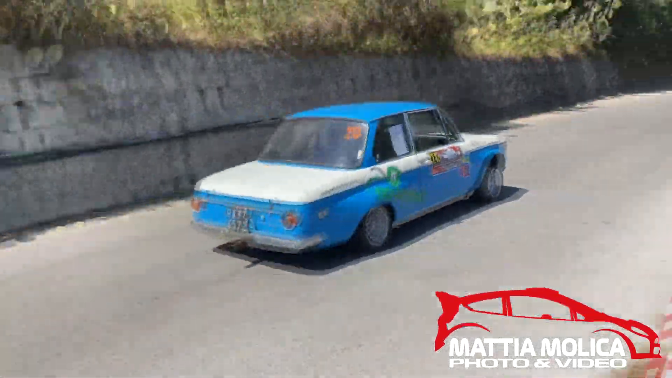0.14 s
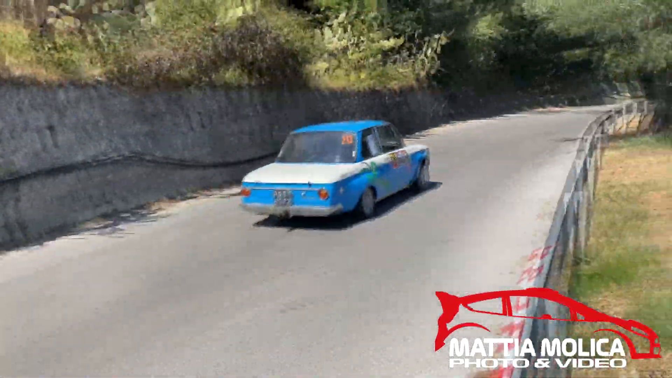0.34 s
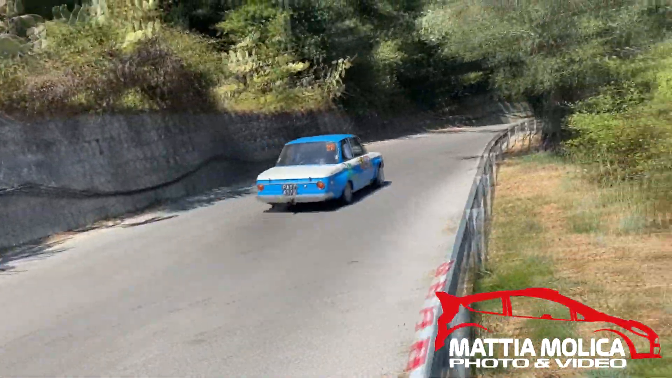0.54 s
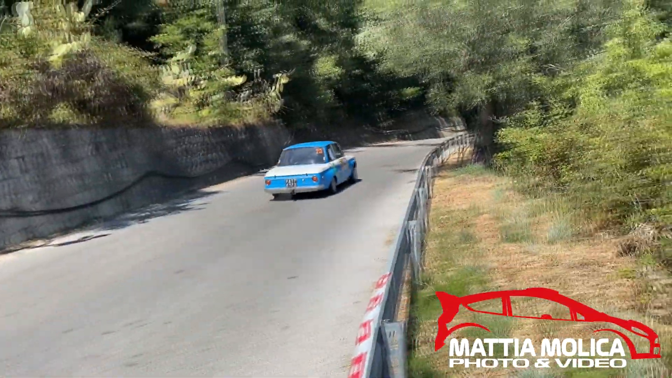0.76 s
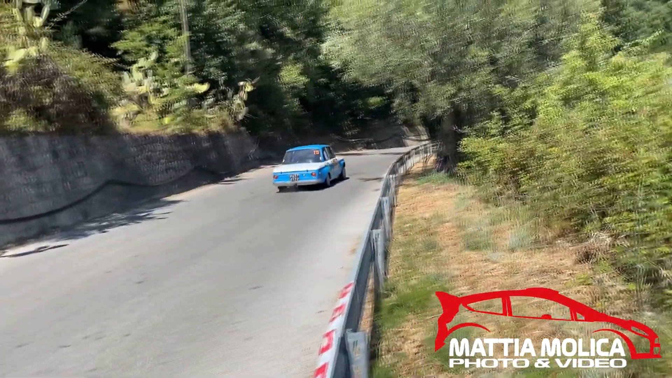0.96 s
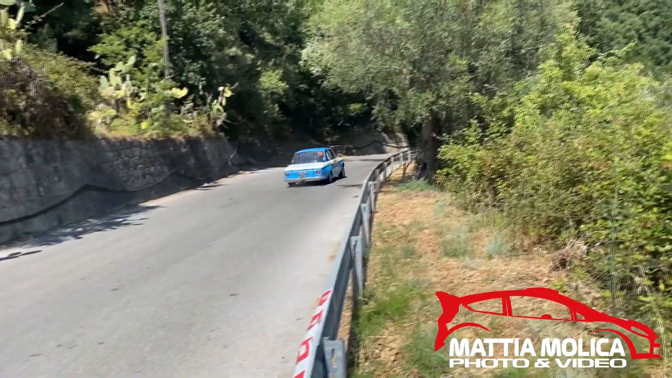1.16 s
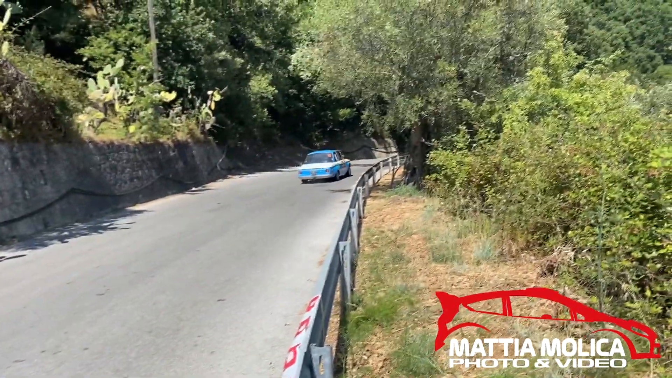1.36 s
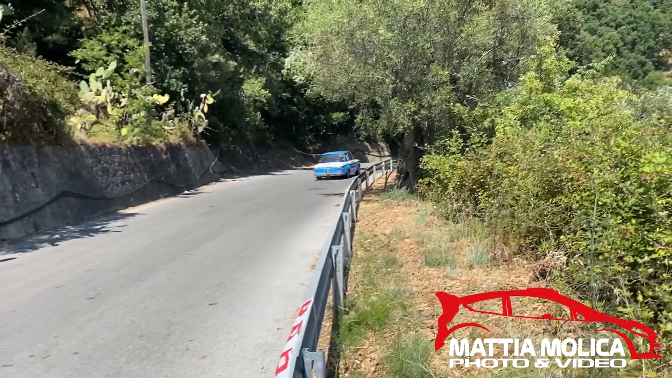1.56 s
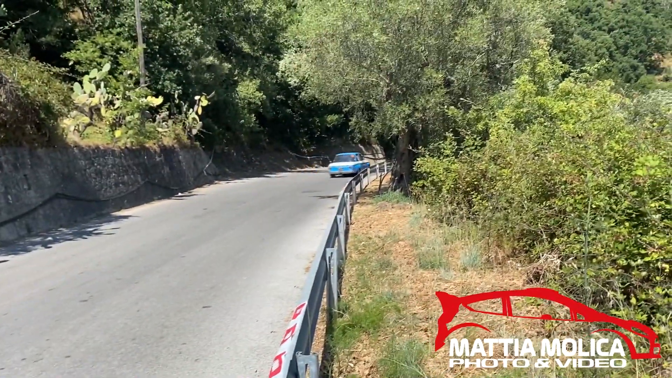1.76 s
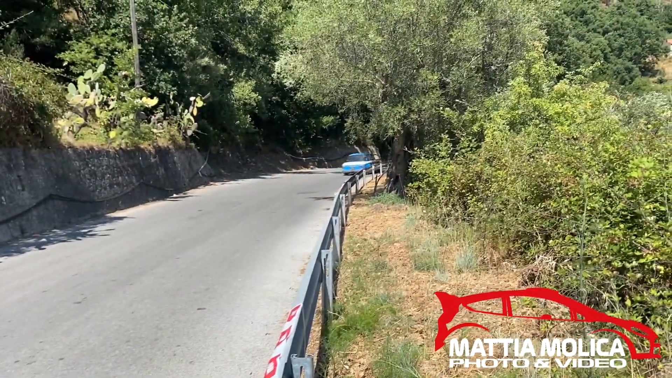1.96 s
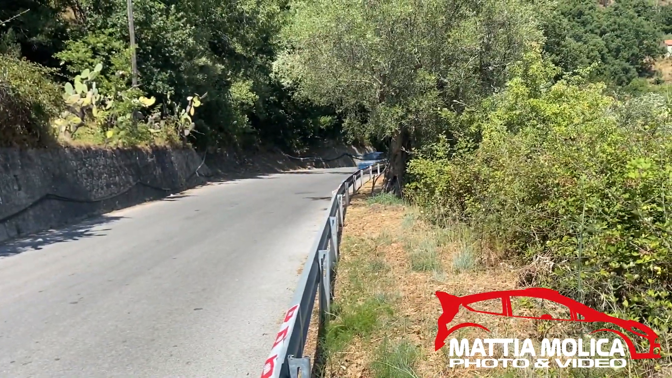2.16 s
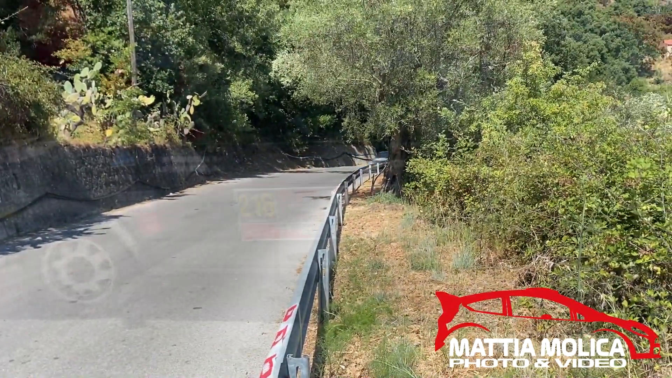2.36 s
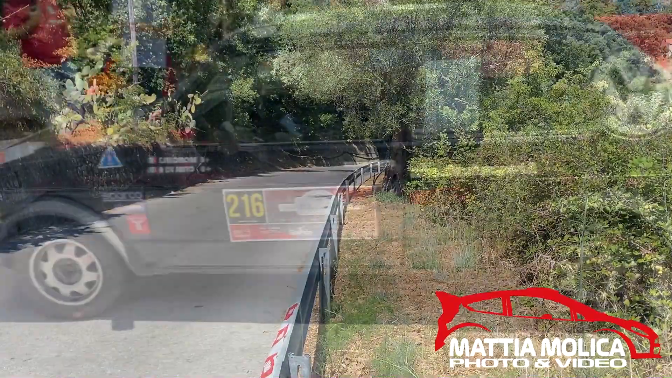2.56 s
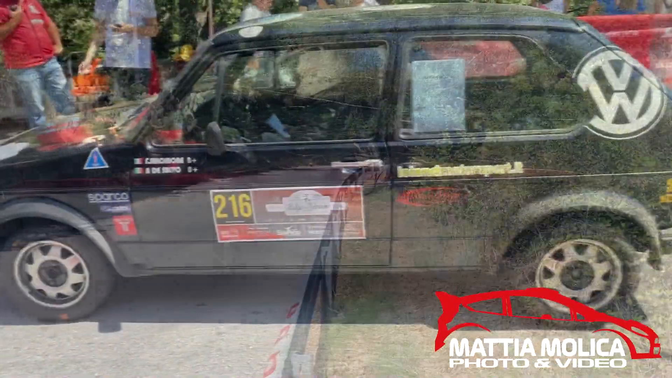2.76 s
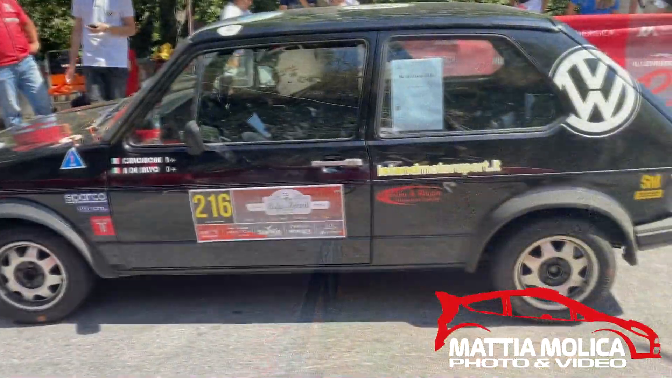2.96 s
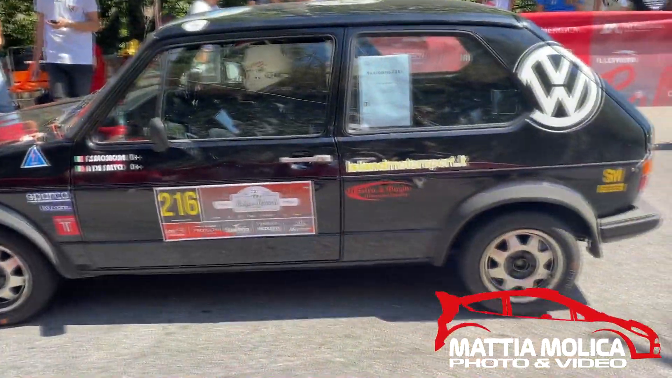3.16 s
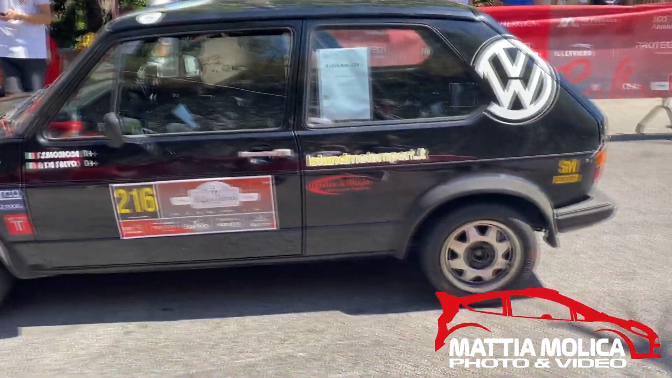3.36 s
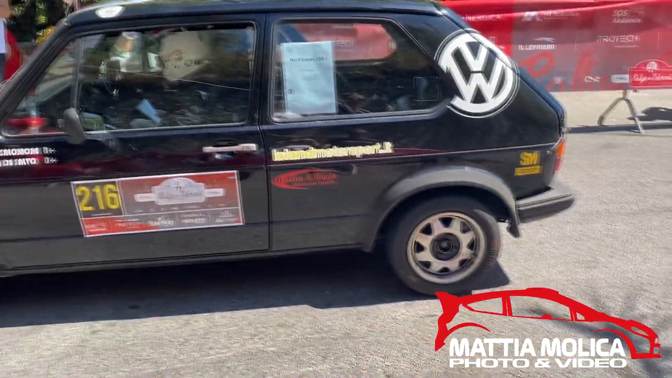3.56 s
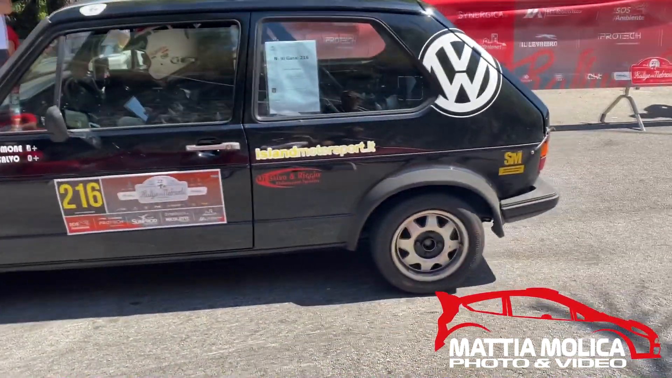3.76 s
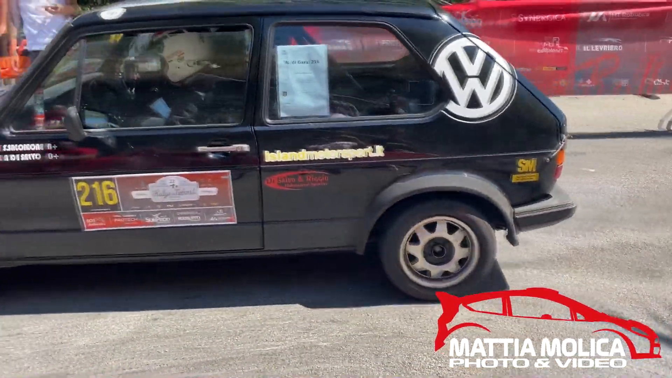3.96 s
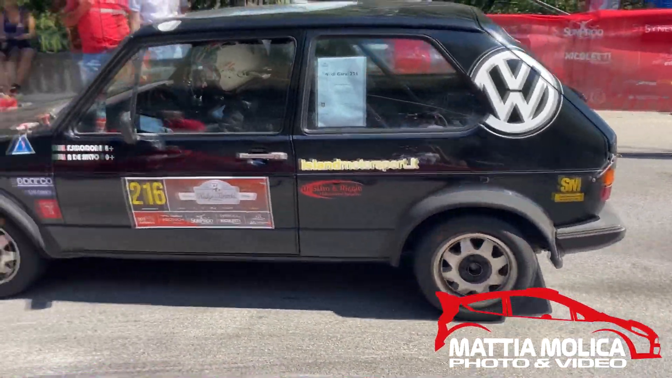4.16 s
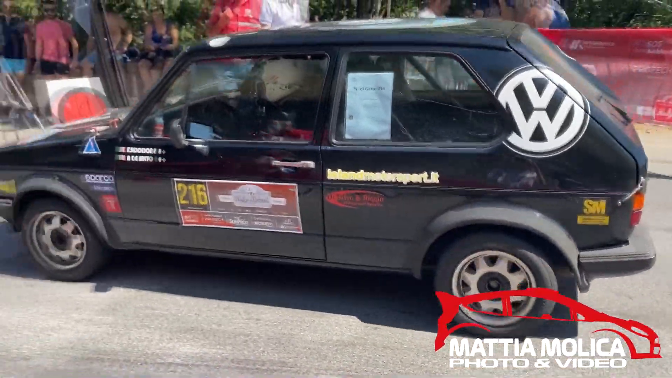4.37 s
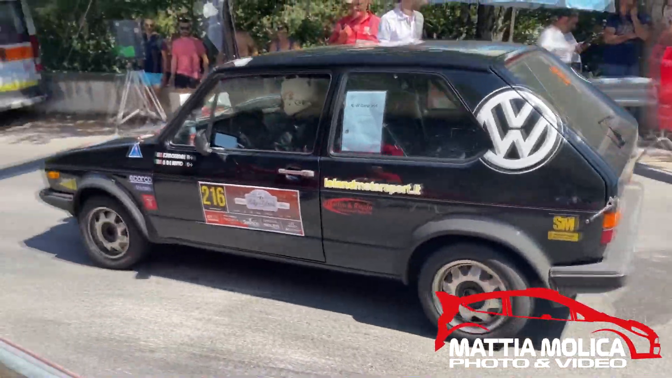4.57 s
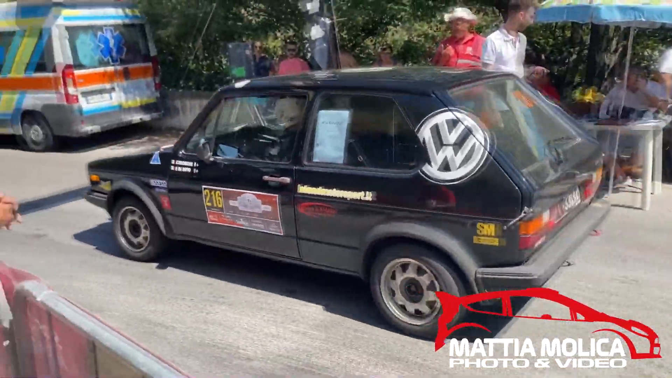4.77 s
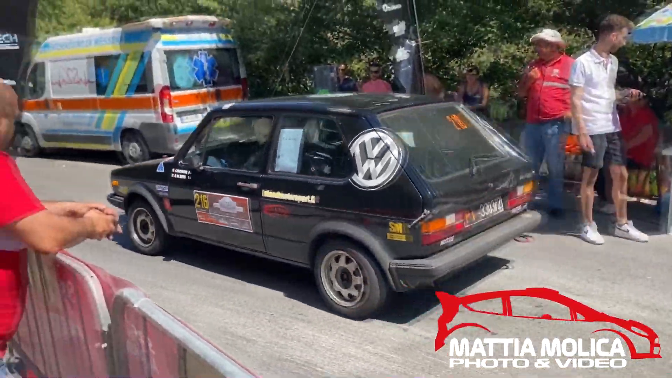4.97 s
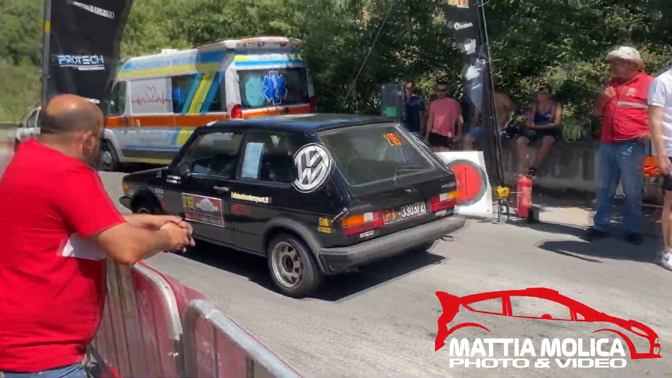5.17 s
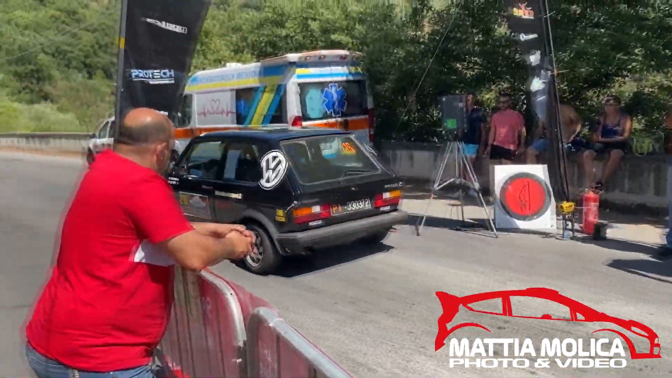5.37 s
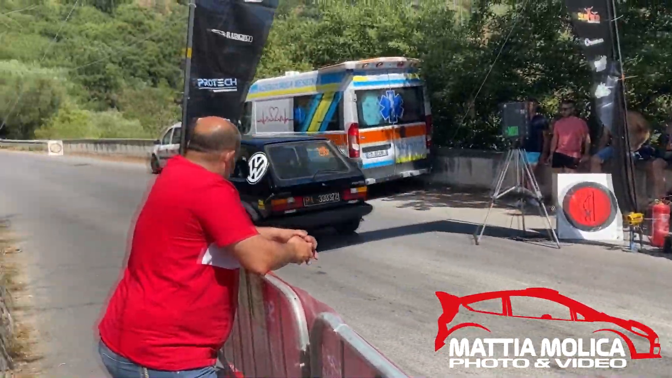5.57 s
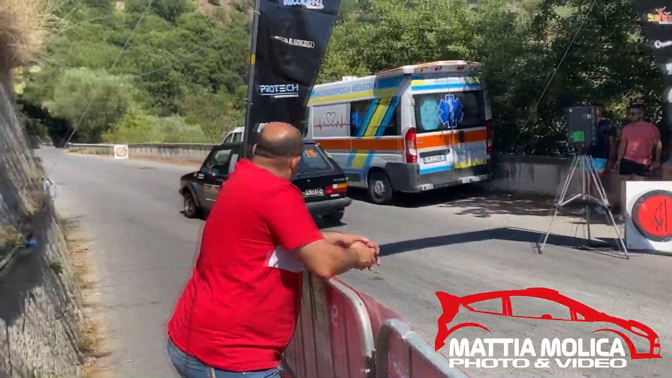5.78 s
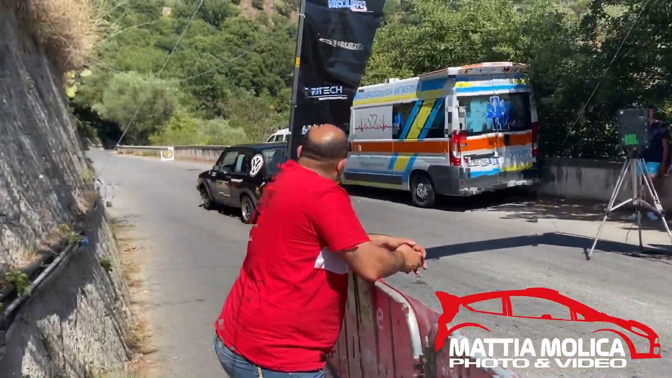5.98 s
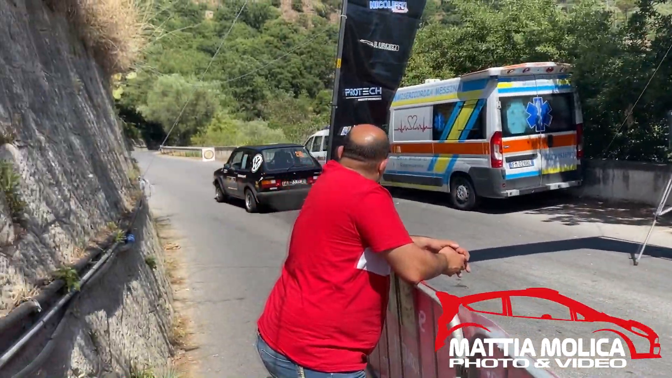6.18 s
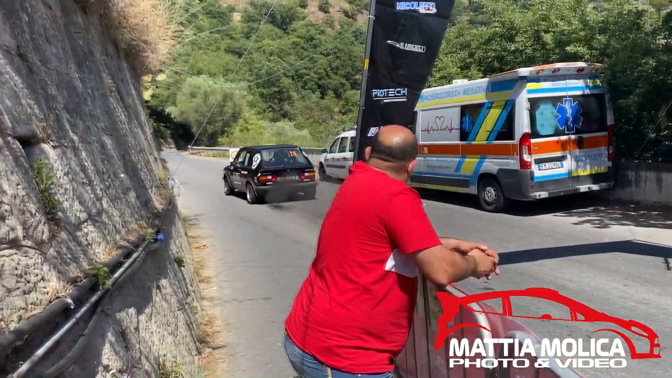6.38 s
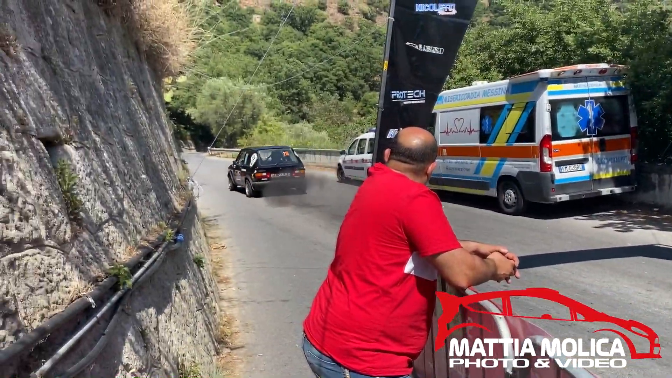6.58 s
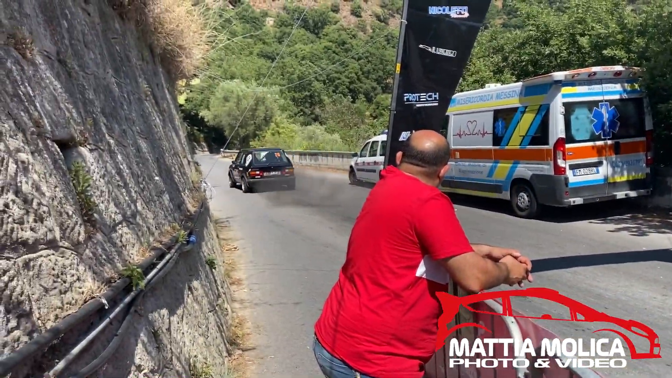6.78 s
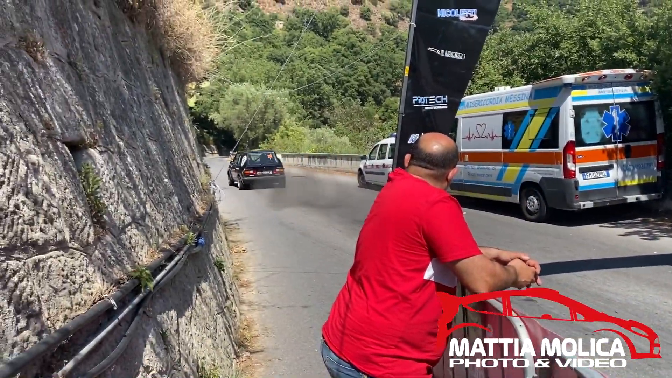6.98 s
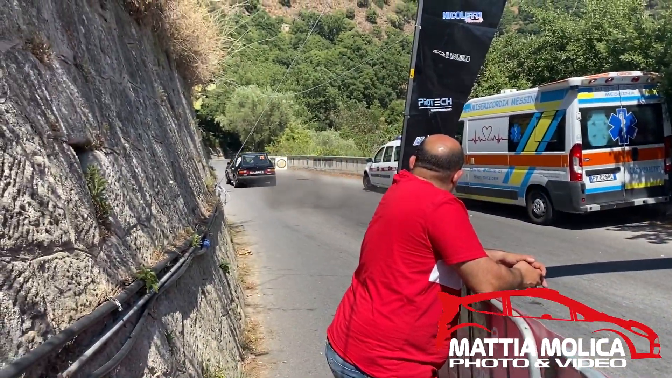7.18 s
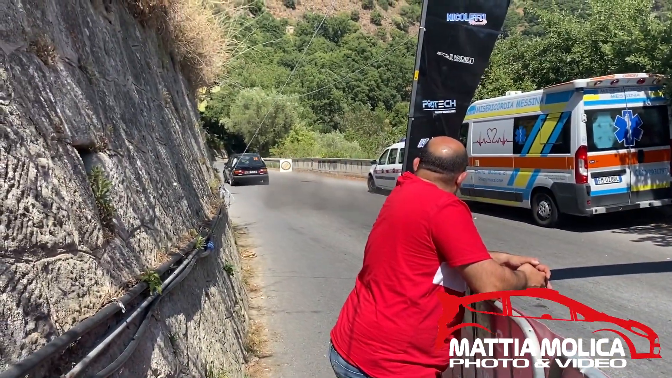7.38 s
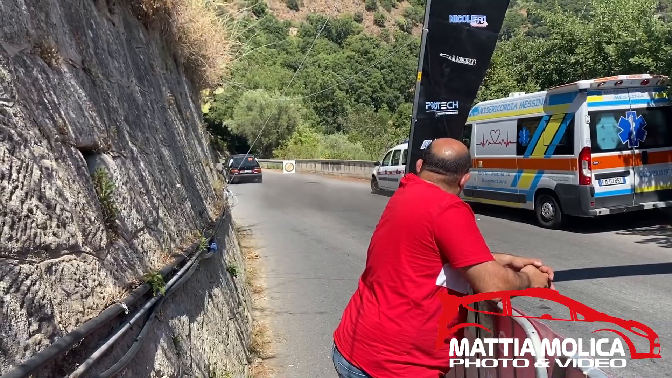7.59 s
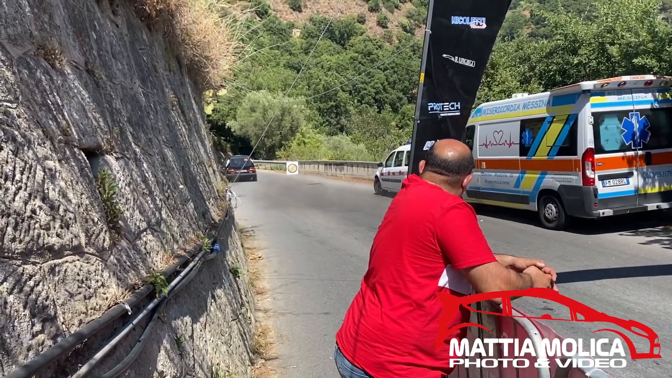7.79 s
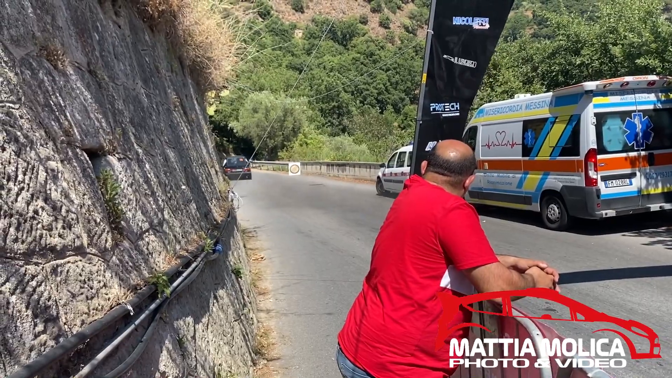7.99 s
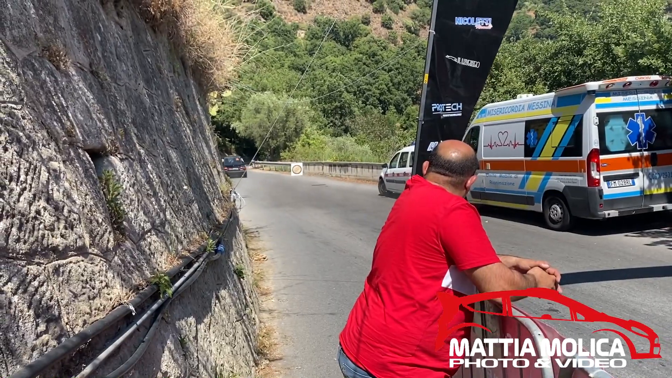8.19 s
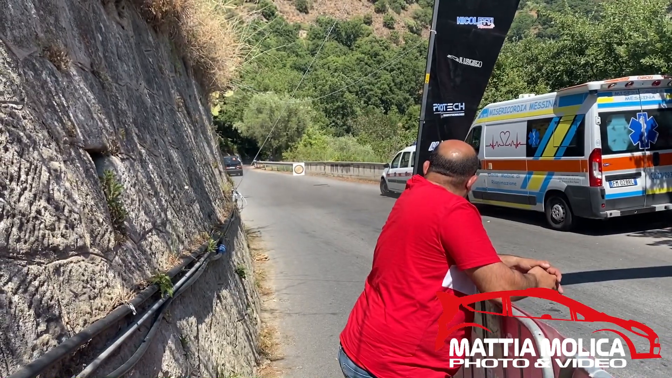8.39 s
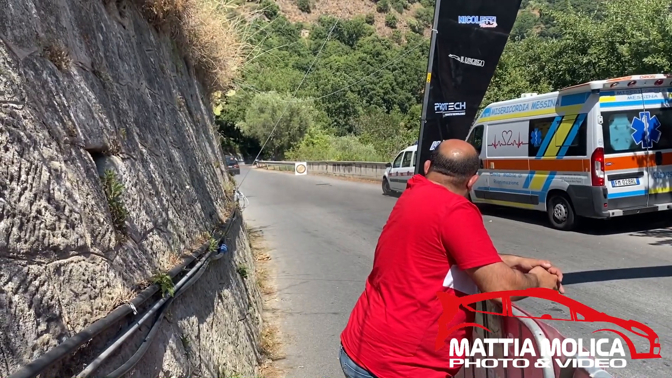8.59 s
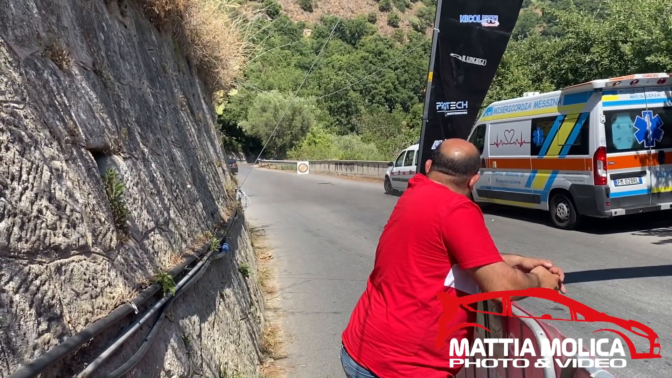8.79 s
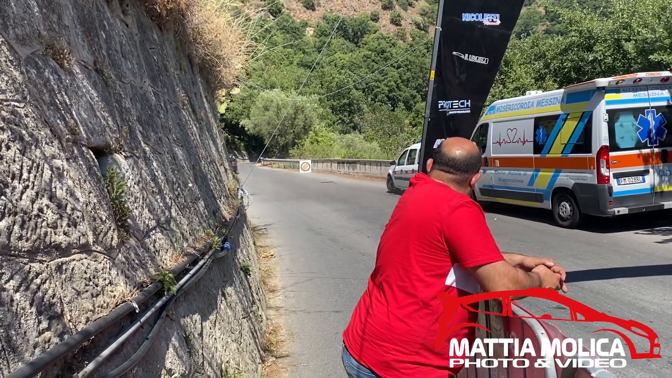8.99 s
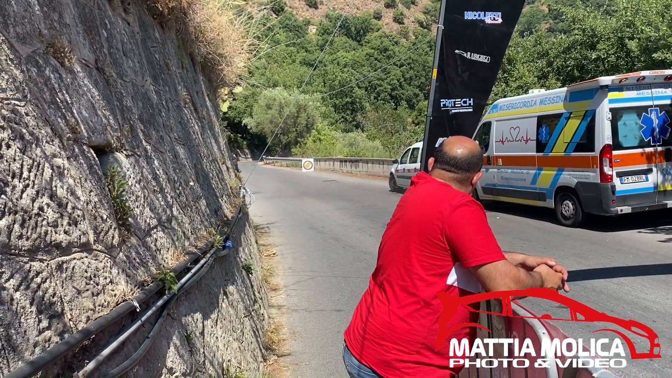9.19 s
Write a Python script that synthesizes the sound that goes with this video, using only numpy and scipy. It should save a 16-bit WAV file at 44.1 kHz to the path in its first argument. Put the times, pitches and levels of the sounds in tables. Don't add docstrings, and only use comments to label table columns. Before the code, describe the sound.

Two old rally cars in turn, heard from the roadside with short echoes off stone. The first leaves with a rising rasp, quickly dropping in level and crackling softly. The second starts close and full, revs held, throttle stabs and low pops, then the note sags, climbs strongly, drops at a gear change and climbs again more quietly. Wind rumbles low on the microphone, strongest at the opening and the launch.

```python
import sys
import numpy as np
from scipy import signal
from scipy.fft import rfft, irfft
from scipy.io import wavfile
from scipy.ndimage import uniform_filter1d

SR = 44100
rng = np.random.default_rng(int(sys.argv[2]) if len(sys.argv) > 2 else 0)


def amplitude_ratio(level_db):
    exponent = np.asarray(level_db, float) / 20
    return 10 ** exponent


def unload_audio(sound):
    columns = np.transpose(np.atleast_2d(sound))
    steps = np.round(np.clip(columns, -1, 1) * 32767)
    wavfile.write(sys.argv[1], SR, steps.astype(np.int16))


N = 407476

# start_s, end_s
FADE_S = [2.2, 2.74]
# start_s, hold_s, fizz_db
BAY = [
    (2.2, 1.304, 7.5),
]


def evened(x):
    return x / np.sqrt(np.mean(x ** 2) + 1e-20)


def steadied(x):
    return x / np.sqrt(abs(uniform_filter1d(x ** 2, size=6000)) + 1e-12)


def wander(size):
    once = uniform_filter1d(rng.standard_normal(N), size=size)
    return evened(uniform_filter1d(once, size=size))


def read(points, hz):
    f, value = np.transpose(points)
    return np.interp(np.log(hz + 1), np.log(f + 1), value)


def columns(rows):
    s, *values = np.transpose(rows)
    return [np.interp(np.arange(N) / SR, s, v) for v in values]


def swell(rows, rise_s, fall_s):
    t = np.arange(N) / SR
    total = 0
    for start_s, hold_s, *values in rows:
        rise = np.clip((t - start_s) / rise_s, 0, 1)
        fall = np.exp(-np.maximum(t - start_s - rise_s - hold_s, 0) / fall_s)
        total = total + np.outer(values, rise * fall)
    return total


def colour(x, points, lo_hz, hi_hz, steep=3):
    hz = abs(np.fft.fftfreq(8192, 1 / SR)) + 1
    edges = (1 + (lo_hz / hz) ** steep) * (1 + (hz / hi_hz) ** steep)
    log_gain = np.log(amplitude_ratio(read(points, hz)) / edges + 1e-6)
    taps = np.fft.ifft(np.exp(np.conj(signal.hilbert(log_gain)))).real[:2048]
    return signal.oaconvolve(x, taps)[:N]


def resonate(x, hz, width):
    turn = np.exp(2j * np.pi * np.cumsum(hz) / SR)
    r = np.exp(-np.pi * width / SR)
    return 2 * (turn * signal.lfilter([1 - r], [1, -r], x / turn)).real


def ports(x, lead, tilt):
    hz, z = np.fft.rfftfreq(N, 1 / SR), rfft(x)
    half = np.exp(.5j * read(lead, hz)) * amplitude_ratio(read(tilt, hz) / 2)
    return np.array([irfft(z * half, N), irfft(z / half, N)])


def exhaust_note(hz, turns, whole_db, uneven_db, odd, far):
    # pitch_hz, level_db_per_hz
    boom = [(60, -41.5), (110, -8), (200, -4.5), (330, -7.5), (450, -9)]
    low = np.zeros(N)
    for k, db in enumerate(whole_db, 1):
        low += amplitude_ratio(db + .5 * k * wander(size=2500)) * np.cos(k * (2 * np.pi * turns + 0.16) - .6)
    for k, db in odd:
        phase = 2 * np.pi * (k * turns + rng.random())
        low += amplitude_ratio(uneven_db + db + 1.6 * wander(size=900)) * np.cos(phase)
    shaking = evened(colour(rng.standard_normal(N), boom, lo_hz=87, hi_hz=475, steep=5.9))
    return low + amplitude_ratio(uneven_db - 5.5 - 2.3 * far) * shaking


def firing_bursts(hz, turns, late, imbalance, rough, cylinders_db, scatter_db, burst_s, bed):
    firing = np.round(turns + late).astype(int)
    since = turns + late - firing
    apart = np.where(since < 0, -since * 0.6, since)
    scatter = scatter_db * rng.standard_normal(N)[firing]
    size = amplitude_ratio(imbalance * np.take(cylinders_db, firing % 4) + scatter)
    clicks = steadied(size * (np.diff(np.sign(since), prepend=1) > 0))
    puff_shape = size * np.exp(-apart / hz / burst_s) + bed * rough
    puffs = steadied(puff_shape * rng.standard_normal(N))
    return size, clicks, puffs


def tailpipe_rasp(drive, pipes, far, ringing, lift, low_peak_hz, middle_peak_hz, ring):
    rasp = np.zeros(N)
    for share, pipe in zip((1 - far, far), pipes):
        rasp += share * evened(colour(drive, pipe, lo_hz=460, hi_hz=2700, steep=6.53))
    rasp = rasp + ringing * resonate(rasp, middle_peak_hz, width=330)
    rasp = rasp - lift * resonate(rasp, np.full(N, 540.), width=262)
    low_peak = resonate(resonate(rasp, low_peak_hz, width=540), low_peak_hz, width=520)
    return steadied(rasp + ring * low_peak)


def gas_hiss(clicks, puffs, rough, pipe, high_peak_hz):
    t = np.arange(N) / SR
    hiss = colour((1 - rough) * clicks + 3.02 * rough * puffs, pipe, lo_hz=2890, hi_hz=8750)
    hiss = hiss + .2 * np.interp(t - 2 / high_peak_hz, t, hiss)
    return steadied(hiss + 1.4 * resonate(hiss, high_peak_hz, width=800))


def engine(hz, drive_table, silencer, stabs, path, odd, pipes, far, habits, heard, cylinders_db, hiss_db, fizz_db,
           scatter_db, burst_s, start, late, bed, ring):
    # start_s, hold_s, level_db
    cuts = [
        (7.045, 0.0031, -9),
        (7.62, 0.067, -8),
    ]
    # start_s, hold_s, share
    coasting = [
        (7.03, 0.55, 1),
    ]
    behind_db = [-0.5, 4.5, -3.5, -7.5]
    t = np.arange(N) / SR
    level_db, facing, lumpy_db = columns(drive_table)
    low_peak_hz, middle_peak_hz, high_peak_hz = columns(path)
    stab_db, bright_db, stab_ring = swell(stabs, rise_s=0.047, fall_s=0.044)
    standing_db = -1.6 * swell(BAY, rise_s=.01, fall_s=0.9)[0] * (t > 2.3)
    lift = swell(coasting, rise_s=0.017, fall_s=0.023)[0]
    level_db = level_db + swell(cuts, rise_s=0.01, fall_s=0.018)[0]

    whole_db = []
    for k, db in enumerate(behind_db, 1):
        order_db = level_db + read(silencer[k > 2], k * hz) + far * db
        if k == 3:
            order_db = order_db + standing_db
        if k > 1:
            order_db = order_db - 14.5 * lift + 0.37 * stab_db
        whole_db.append(order_db)
    uneven_db = level_db + lumpy_db
    rasp_db = level_db - 14 + 15 * facing + stab_db
    hiss_db = rasp_db + hiss_db + bright_db - 0.53 * far

    rough, imbalance, ringing = (near + (away - near) * far for near, away in habits)
    imbalance = imbalance + 2.9 * lift
    ringing = ringing + stab_ring + .8 * lift
    rough = np.clip(rough + .016 * (lumpy_db + 20) - .01 * stab_db, 0, 1)

    turns = start + np.cumsum(hz * (1 + .0015 * wander(size=300))) / SR
    low = exhaust_note(hz, turns, whole_db, uneven_db, odd, far)
    size, clicks, puffs = firing_bursts(
        hz, turns, late, imbalance, rough, cylinders_db, scatter_db, burst_s, bed)
    drive = ((1 - rough) * clicks + rough * puffs) / size ** .35
    rasp = tailpipe_rasp(drive, pipes, far, ringing, lift, low_peak_hz, middle_peak_hz, ring)
    hiss = gas_hiss(clicks, puffs, rough, pipes[1], high_peak_hz)
    jet = (puffs + 1.4 * (1 - rough) * clicks) * heard
    sound = (np.sqrt(2) * low + amplitude_ratio(rasp_db) * rasp + amplitude_ratio(hiss_db) * hiss) * heard
    return sound, jet, amplitude_ratio(hiss_db + fizz_db - 2.8 * far) * heard


def leaving_car():
    # time_s, firings_hz
    speed = [(0, 195), (.3, 196.5), (.5, 201), (.7, 208), (.9, 213), (1.2, 218), (2.74, 233)]
    # time_s, level_db, tailpipe_facing (0-1), lumpy_running_db
    load = [(0, -15, 0.73, -10.5), (.2, -15, 0.54, -12), (.35, -15, 0.5, -16), (.54, -25.5, 1.08, -5),
            (1.08, -21.5, .4, -9.5), (1.38, -30, 0.55, -5.5), (1.9, -32, 0.56, -7), (2.1, -33.5, 0.4, -3),
            (2.4, -31.5, 0.45, -20)]
    # pitch_hz, gain_db
    silencer = [
        [(190, -1), (240, 1), (400, -15), (470, -29.5)],
        [(600, -20.5), (700, -2.5), (900, -55)],
    ]
    # start_s, hold_s, rasp_db, extra_hiss_db, tailpipe_ring (0-3)
    stabs = [
        (-.06, 0.18, -1.1, 3.5, 0.13),
        (0.165, 0.19, -1.5, 7, .1),
        (0.597, 0.0077, -1.5, 4, .1),
        (1.125, 0.014, 2, 4.5, .1),
    ]
    # time_s, low_hz (road echo), middle_hz (tailpipe ring), high_hz (road echo)
    path = [(0, 970, 2270, 5050), (.25, 850, 2260, 3650), (.4, 900, 1310, 3840), (.9, 840, 2040, 3520),
            (2.74, 844, 1960, 3170)]
    # multiple_of_firing_rate, level_db
    odd = [(.25, -41.5), (.5, 1), (.75, -12.5), (1.25, -9), (1.5, -7.5), (1.75, -22)]
    # pitch_hz, level_db_per_hz
    pipe = [(280, 25), (480, -19), (579, -8.5), (683, -9), (742, -7), (939, -11.5), (1280, -10),
            (2090, -14.5), (2840, -12), (3590, -6.5), (8000, -11.5), (10400, -124), (17600, -120)]
    # start_s, end_s
    recede_s = [.4, 1.8]
    habits = [
        (.17, .45),
        (1.8, .7),
        (1.6, 1.1),
    ]
    cylinders_db = [-1, 1, 9.5, -10]
    t = np.arange(N) / SR
    return engine(
        columns(speed)[0], load, silencer, stabs, path, odd, (pipe, pipe),
        np.interp(t, recede_s, [0, 1]), habits, np.clip((FADE_S[1] - t) / 0.25, 0, 1), cylinders_db,
        hiss_db=-16, fizz_db=-2.5, scatter_db=.7, burst_s=.0011, start=.45, late=.15, bed=.9, ring=1.5)


def walls(x):
    # pitch_hz, t60_s, level_db
    stone = [(400, .3, -5), (1200, .3, -6), (2500, .3, -3), (5000, .25, 1)]
    taps = np.zeros((2, SR // 2))
    at = np.arange(120, SR // 2 - 20, 20) + rng.integers(0, 20, (2, (SR // 2 - 121) // 20))
    np.put_along_axis(taps, at, rng.choice([-1., 1.], at.shape), 1)
    hz, t, z = signal.stft(taps, SR, nperseg=256)
    t60 = read([(f, s) for f, s, _ in stone], hz)[:, None]
    db = read([(f, level) for f, _, level in stone], hz)[:, None]
    decay = amplitude_ratio(db - 60 * t / t60) / np.sqrt(t60)
    tail = signal.istft(z * decay * (hz > 400)[:, None], SR, nperseg=256)[1]
    return signal.oaconvolve(x[None], .08 * tail, axes=1)[:, :N]


def rumble():
    # pitch_hz, level_db_per_hz
    spectrum = [(12, -1), (25, -23), (50, -13.5), (80, -1), (120, -5)]
    # start_s, hold_s, level_db
    gusts = [
        (-.2, .3, 19.5),
        (2.8, .4, 14.5),
        (4.5, .02, 3),
        (5.5, .2, 9.5),
        (8.8, 0.016, 3),
    ]
    shared, left, right = rng.standard_normal((3, N))
    noise = [colour(shared + 0.25 * side, spectrum, lo_hz=5.9, hi_hz=132) for side in (left, right)]
    return amplitude_ratio(-50 + swell(gusts, rise_s=0.18, fall_s=0.58)[0]) * evened(np.array(noise))


def pops():
    # start_s, peak_db
    backfires = [(1.243, -28), (1.398, -22.5), (1.477, -26), (1.56, -22), (1.629, -29), (1.702, -23.5),
                 (1.793, -23), (1.861, -26.5), (1.976, -26), (2.084, -29), (2.187, -26.5), (2.289, -30),
                 (3.128, -17), (3.401, -9.5), (3.699, -26), (7.633, -24)]
    t, out = np.arange(2600) / SR, np.zeros(N)
    thump = np.sin(2 * np.pi * 145 * t) * t / 0.013 * np.exp(1 - t / 0.0069)
    crack = resonate(rng.standard_normal(2600), np.full(2600, 1400.), width=535)
    crack = crack * np.exp(-abs(t - .004) / .004)
    for s, db in backfires:
        out[round(s * SR)] = amplitude_ratio(db + 8.5)
    return signal.oaconvolve(out, thump + amplitude_ratio(-7.5) * crack)[:N]


def launching_car(far):
    # time_s, firings_hz
    speed = [(2.38, 141.2), (2.56, 149.1), (2.96, 156.3), (3.25, 159.3), (3.7, 158.4), (4.2, 179),
             (4.45, 176), (4.93, 139.4), (5.1, 134.1), (5.28, 130.6), (5.44, 144.1), (6.38, 194),
             (6.95, 232.8), (7.04, 238.2), (7.1, 222.7), (7.94, 139.5), (8.08, 149.2), (9.24, 188.5)]
    # time_s, level_db, tailpipe_facing (0-1), lumpy_running_db
    load = [(2.25, -31, 0.42, -4), (2.64, -15.5, 0.45, -13), (3.0, -14, 0.06, -13.5),
            (3.6, -12.5, 0.1, -13.5), (3.84, -13, 0.49, -23), (4.48, -13.5, 0.2, -23),
            (4.96, -19.5, 0.25, -13), (5.3, -19, .25, -10.5), (5.58, -20.5, 0.39, -16),
            (5.86, -15.5, 0.35, -21), (6.3, -19, 0.65, -17.5), (6.74, -18.5, 0.6, -10),
            (7.0, -21, 0.59, -15), (7.45, -25.5, 0.56, -24), (7.62, -30.5, 1.09, -5),
            (7.9, -22.5, 0.22, -19), (8.52, -20.5, 0.28, -21.5), (9.24, -32, 0.59, -6.5)]
    # pitch_hz, gain_db
    silencer = [
        [(130, -1), (165, 1), (193, -1), (235, 0), (320, -9), (400, -12.5), (470, -17)],
        [ (400, -21.5), (452, -6), (490, -21), (540, -32), (600, -16.5), (650, -33.5)],
    ]
    # start_s, hold_s, rasp_db, extra_hiss_db, tailpipe_ring (0-3 and above)
    stabs = [(3.37, 0.0055, 1.67, -1, .1), (3.658, 0.061, 8.3, -1.5, 3), (3.85, .15, 0.51, -3.3, 4.9),
             (4.2, 0.041, 3.9, -2.5, .5), (4.57, 0.094, 6.6, 3, .1), (4.8, .3, .1, 0.6, 5.3),
             (5.08, 0.12, 1.2, 2, .1), (5.55, 0.054, 3.2, 8, .5), (5.7, 0.023, 3.9, 3, 0.092),
             (5.8, 0.09, 2.6, -8, .1), (6.4, 0.27, 0.17, 6, 0.95), (7.28, 0.2, 0.51, 5.5, .1),
             (8.36, 0.35, 0.47, 2.5, .1), (8.9, .3, .1, 2.6, 2.5)]
    # time_s, low_hz (road echo), middle_hz (tailpipe ring), high_hz (road echo)
    path = [(2.2, 1430, 2094, 3450), (2.7, 1530, 2150, 3640), (4.702, 1450, 2170, 3270),
            (4.95, 513, 2100, 3670), (5.3, 740, 1990, 4920), (5.52, 875, 2010, 6800),
            (5.6, 990, 2100, 3540), (5.9, 949.7, 1220, 3660), (6.5, 1040, 2072, 3190),
            (7.5, 1243, 2200, 3650), (8.0, 1021, 1199, 3280), (8.7, 1021, 1798, 3597),
            (9.24, 1010, 2060, 3443)]
    # multiple_of_firing_rate, level_db
    odd = [(.5, -18), (.75, -2.5), (1.25, -1), (1.5, -6.5), (1.751, -8), (2.25, -9)]
    # pitch_hz, level_db_per_hz
    pipe_side = [(280, 18), (480, 0), (629, -2.5), (716, -6.5), (787, 2.5), (1060, 2), (1470, 1),
                 (1790, -13.5), (2070, -6), (2580, -7.5), (3390, -97), (8000, -93), (10400, -96),
                 (17600, -120)]
    # pitch_hz, level_db_per_hz
    pipe_behind = [(300, -8.5), (480, 10), (600, -5), (800, 11), (1000, 5.5), (1500, 5.5), (2100, -3),
                   (2600, -10), (3300, -17.5), (5700, -24), (8000, -20), (10400, -49)]
    habits = [
        (.36, .39),
        (1.9, 2.4),
        (.5, 2.3),
    ]
    cylinders_db = [-1.84, -2.5, -3, -6.5]
    t = np.arange(N) / SR
    flywheel_s, catch_s, catch_width_s, catch_hz = .04, 7.68, 0.058, 14
    u = (t - catch_s) / catch_width_s
    hz = uniform_filter1d(columns(speed)[0], size=round(flywheel_s * SR)) + catch_hz * u * np.exp(-u ** 2)
    sound, jet, fizz_level = engine(
        hz, load, silencer, stabs, path, odd, (pipe_side, pipe_behind), far, habits,
        np.clip((t - FADE_S[0]) / 0.093, 0, 1), cylinders_db,
        hiss_db=-10, fizz_db=-11.5, scatter_db=.8, burst_s=.0019, start=0, late=.55, bed=1.1, ring=1.4)
    return sound, jet, fizz_level * amplitude_ratio(swell(BAY, rise_s=0.035, fall_s=0.046)[0])


def jet_fizz(jet, level):
    # pitch_hz, level_db_per_hz
    spectrum = [(6000, -36), (8000, 9.5), (11000, -1), (14000, -0.5), (15800, -7)]
    return level * steadied(colour(jet, spectrum, lo_hz=6440, hi_hz=18600))


def scene():
    turn_s = [6.3, 6.27]
    # pitch_hz, lead_rad
    lead_first = [(250, 0), (1300, .2), (2300, 1.7), (4400, .6)]
    # pitch_hz, lead_rad
    lead_near = [(250, -.2), (800, -.9), (1800, -1.6), (2400, -.3)]
    # pitch_hz, lead_rad
    lead_far = [(250, 0), (1300, .9), (2500, .5), (6000, .3)]
    # pitch_hz, tilt_db
    tilt_first = [(100, 0.86), (1000, 3.4), (5000, 5.6)]
    # pitch_hz, tilt_db
    tilt_second = [(100, 2.05), (1000, 0.54), (5000, 8.3)]
    far = np.interp(np.arange(N) / SR, turn_s, [0, 1])
    first, first_jet, first_fizz = leaving_car()
    second, second_jet, second_fizz = launching_car(far)
    direct = ports(first + pops(), lead_first, tilt_first)
    direct = direct + ports(second * (1 - far), lead_near, tilt_second)
    direct = direct + ports(second * far, lead_far, tilt_second)
    fizz = jet_fizz(first_jet + second_jet, first_fizz + second_fizz)
    return amplitude_ratio(-0.43) * direct + walls(first + second) + rumble() + fizz


def top_cut(x):
    return signal.sosfilt(signal.butter(12, 16860, fs=SR, output="sos"), x)


def record(dry):
    # pitch_hz, half_cycles
    top_turn = [(7300, 0), (8650, -1), (9550, -1), (10450, -2), (11700, -2), (12600, -3), (13750, -3),
                (14600, -4)]
    hz, z = np.fft.rfftfreq(N, 1 / SR), rfft(dry)
    shared = np.clip((hz - 6000) / 1000, 0, 1)
    half = np.exp(.5j * np.pi * np.interp(hz, *np.transpose(top_turn)))
    top = z.mean(0) * np.array([half, 1 / half])
    heard = irfft(((1 - shared) * z + shared * top) * (hz < 15900), N)
    heard = .97 * np.tanh(abs(heard / .97) ** 3) ** (1 / 3) * np.sign(heard)
    return top_cut(heard)


dry = scene()
out = record(dry)
unload_audio(out)
```